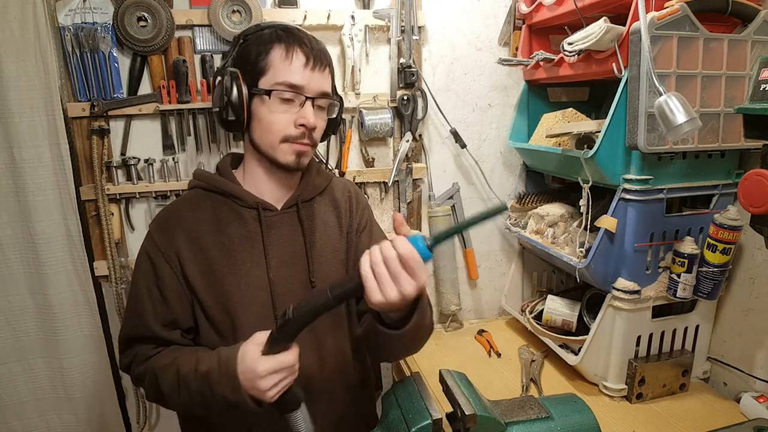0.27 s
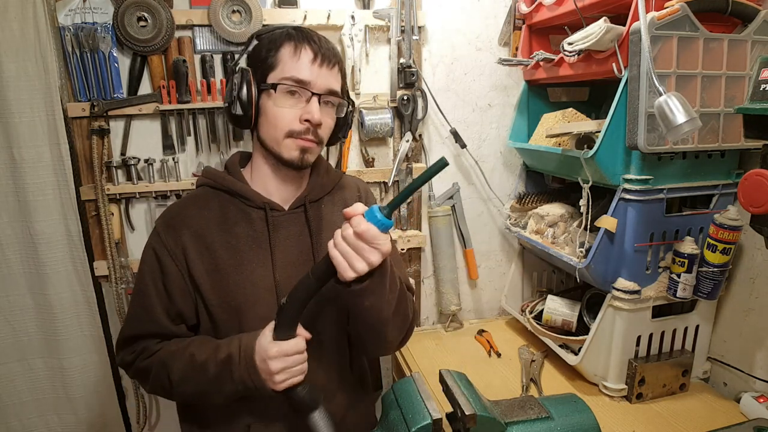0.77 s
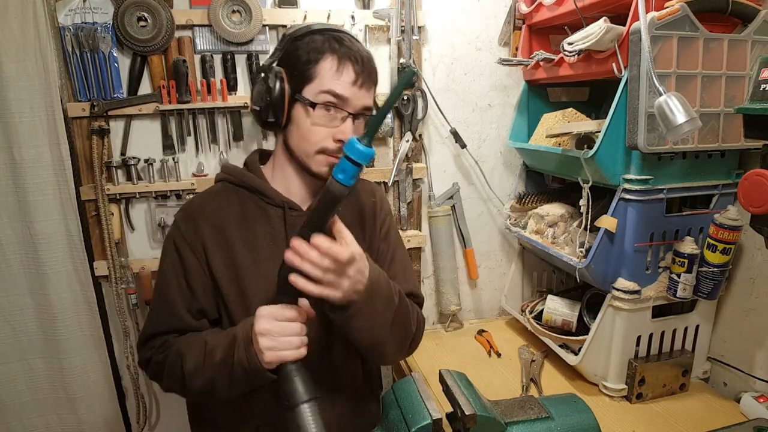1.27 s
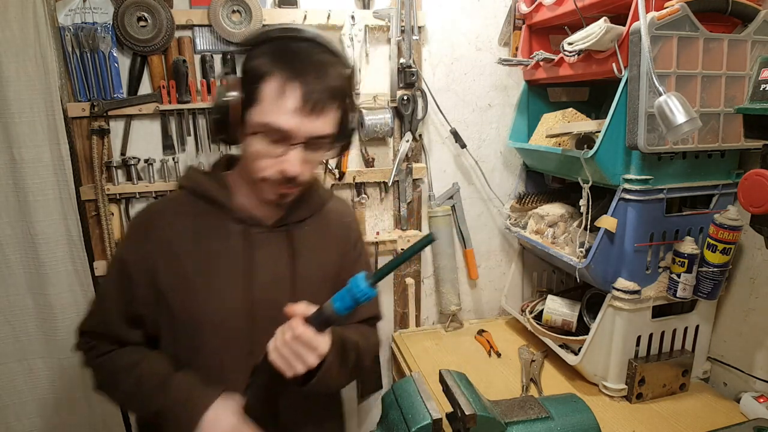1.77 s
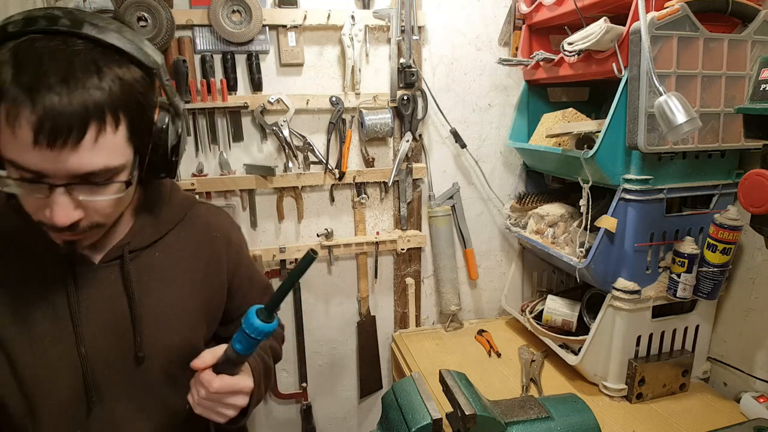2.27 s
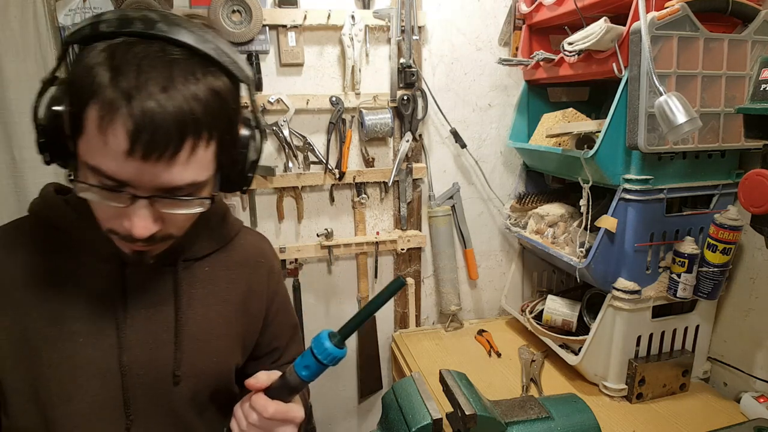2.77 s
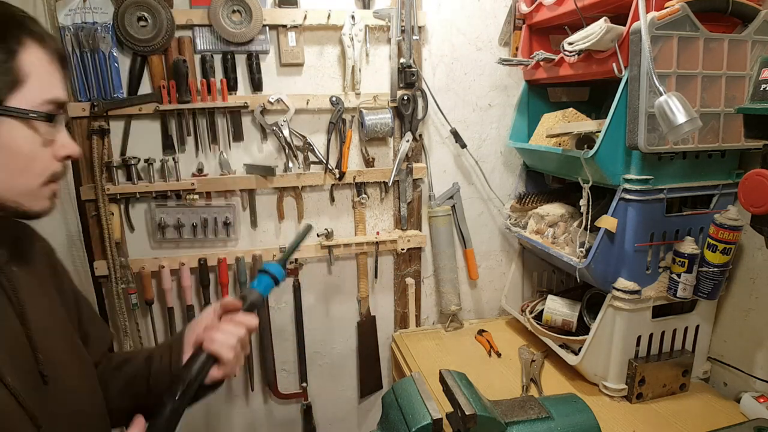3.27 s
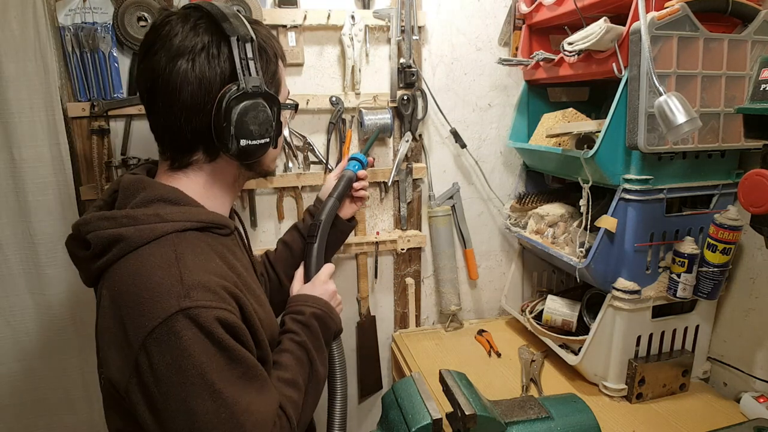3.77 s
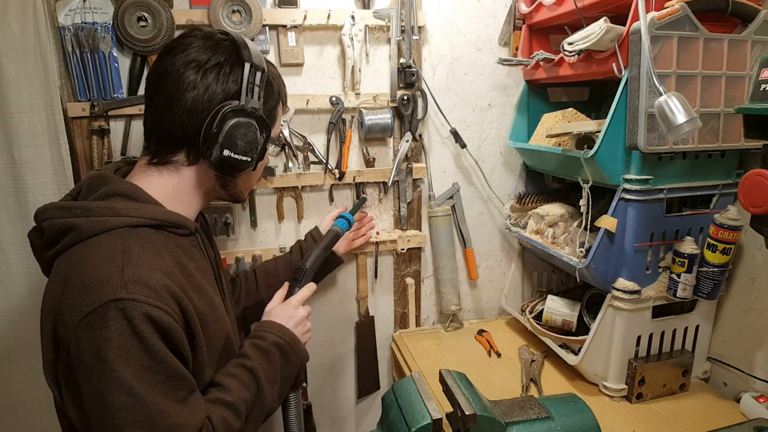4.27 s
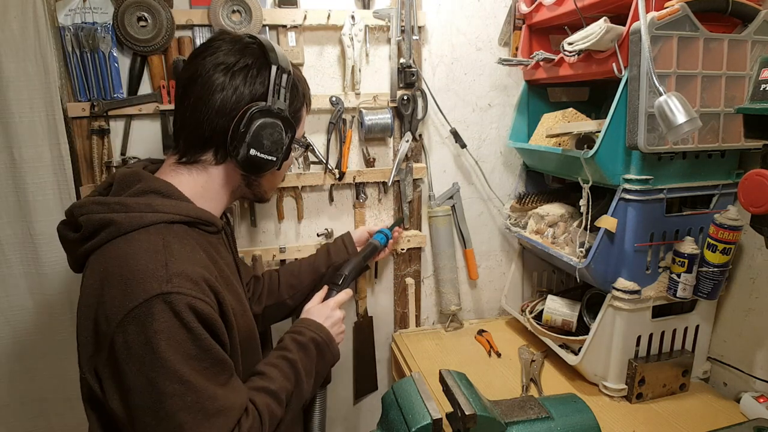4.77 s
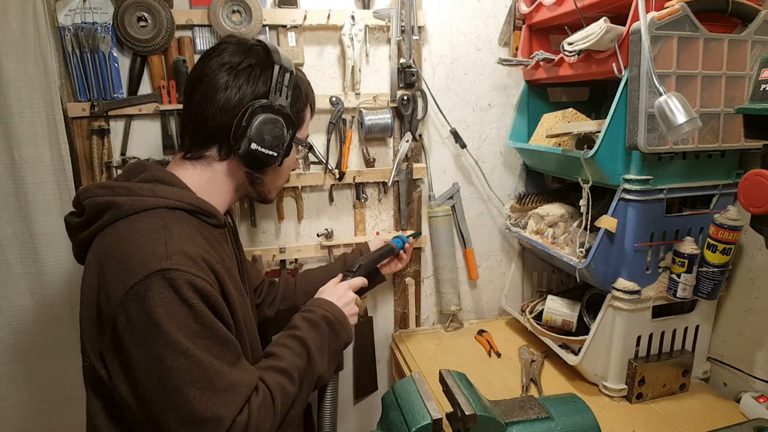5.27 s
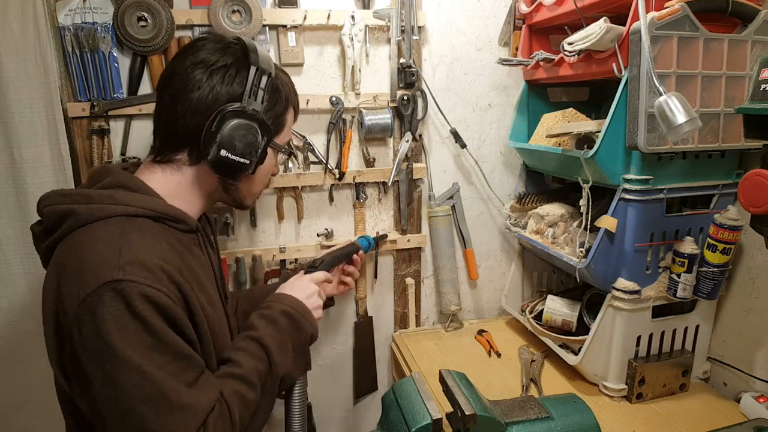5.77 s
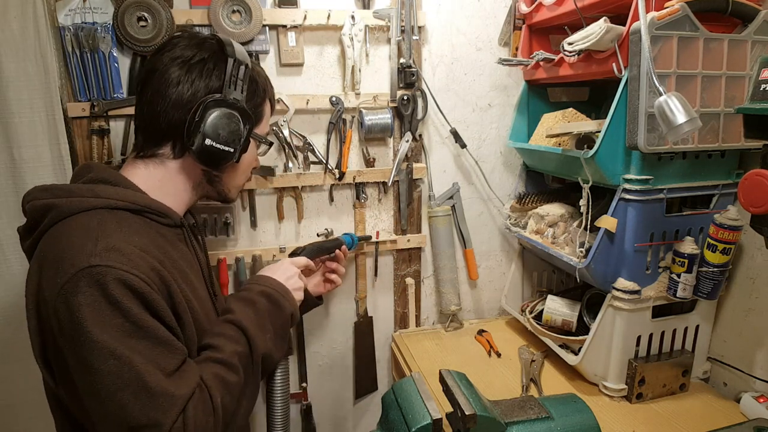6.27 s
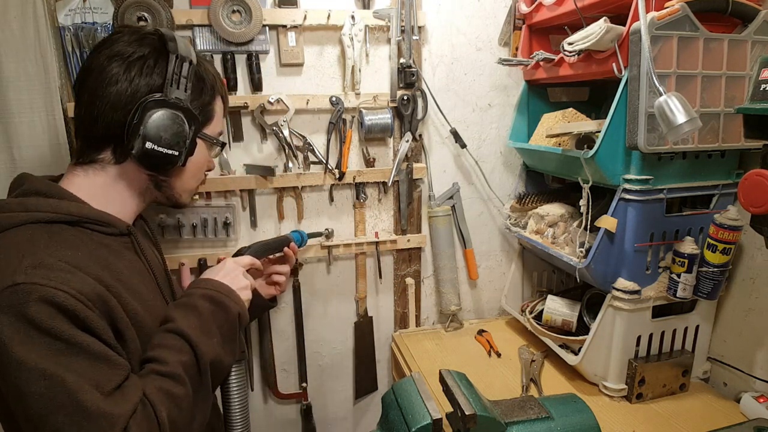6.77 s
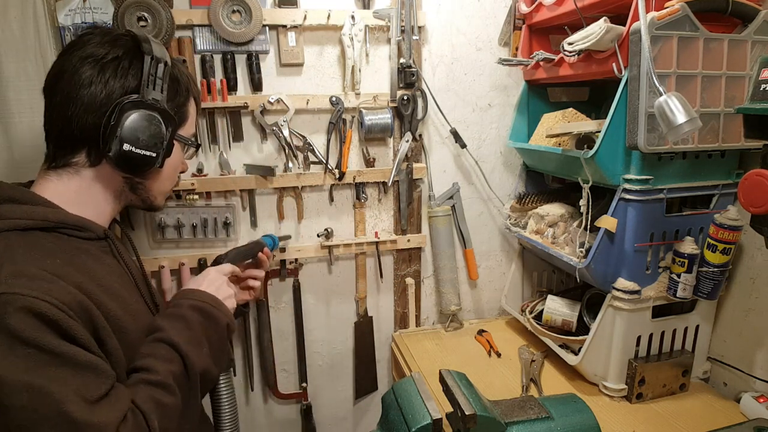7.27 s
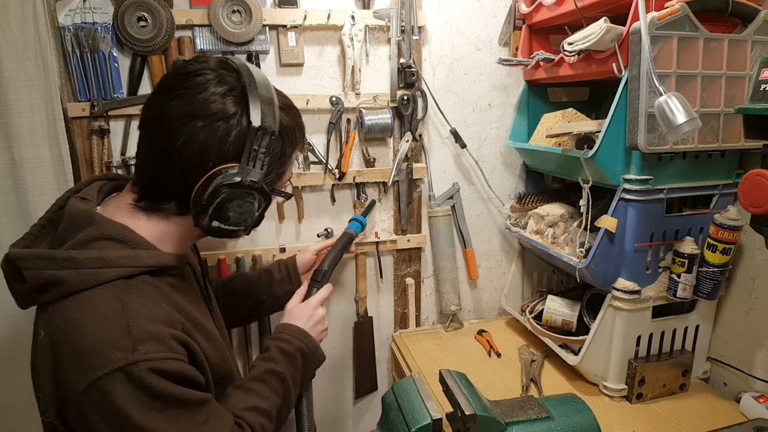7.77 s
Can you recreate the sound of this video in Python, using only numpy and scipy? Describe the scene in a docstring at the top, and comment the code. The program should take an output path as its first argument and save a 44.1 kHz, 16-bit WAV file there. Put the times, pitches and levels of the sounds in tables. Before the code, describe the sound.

Soft hose handling and footsteps in a workshop, then a shop vacuum switches on and runs with a whine and rushing, spitting air.

```python
"""A small workshop with a shop vacuum, heard through one microphone. The plastic hose is handled and
knocked, two steps thud on the floor, then the switch snaps and the motor spins up at once.
Its shaft sings, its fan blades whine and the mains current hums over rushing air.
The air roars in the hose at first, and spits as fingers and objects come near the narrow nozzle."""
import sys
import numpy as np
from scipy import signal
from scipy.fft import rfft, irfft, next_fast_len
from scipy.io import wavfile
from scipy.ndimage import uniform_filter1d, map_coordinates

SR = 44100
rng = np.random.default_rng(int(sys.argv[2]) if len(sys.argv) > 2 else 0)


def materialize(psi):
    """Save the field psi as 16-bit PCM at rate SR to the path in sys.argv[1].

    A 1-D psi becomes a single channel; in a 2-D psi each row is a channel.
    """
    bounded = np.clip(np.atleast_2d(psi).T, -1, 1)
    quanta = np.round(bounded * 32767).astype(np.int16)
    wavfile.write(sys.argv[1], SR, quanta)


N = 354211
TIME = np.arange(N) / SR
ONE_SECOND = np.arange(SR) / SR
SWITCH_S, FREE_UNTIL_S = 3.062, 3.765  # the switch closes; the nozzle leaves free air


def amp(db):
    """Turn decibels (dB) into a number to multiply by."""
    return 10 ** (np.asarray(db) / 20)

def unit(x):
    """Scale a signal to an average power of 1."""
    return x / np.sqrt(np.mean(x ** 2) + 1e-20)

def along(points, hz):
    """Read between (Hz, value) points, with octaves evenly spaced."""
    freqs, values = np.transpose(points)
    return np.interp(np.log(hz + 1), np.log(freqs + 1), values)

def curve(points):
    """Join (seconds, value) points with straight lines."""
    return np.interp(TIME, *np.transpose(points))

def wobble(rate):
    """A smooth random curve through `rate` points a second."""
    return map_coordinates(rng.standard_normal(int(N * rate / SR) + 4), [TIME * rate])

def bump(s, length):
    """A bell-shaped rise and fall around time s."""
    return np.exp(-np.minimum(((TIME - s) / length) ** 2, 60))

def after(s, change_s=0.013):
    """A smooth step from 0 to 1 at time s."""
    return (1 + np.tanh((TIME - s) / change_s / 2)) / 2

def struck(db, rise, fade):
    """The loudness of a knock: it rises fast, then drops 60 dB in `fade` seconds."""
    return amp(db - 60 * ONE_SECOND / fade) * (1 - np.exp(-ONE_SECOND / rise))

def filtered(x, response):
    """Turn each frequency of x up or down by response(hz)."""
    size = next_fast_len(len(x) + 8192)
    return irfft(rfft(x, size) * response(np.fft.rfftfreq(size, 1 / SR)), size)[:len(x)]

def boost(peaks, hz):
    """The dB added by resonances, the pitches at which a thing likes to ring."""
    return sum(db / (1 + (2 * (hz - centre) / width) ** 2) for centre, width, db in peaks)

def noise(colour, peaks=()):
    """Noise with a colour (its balance of low and high) and resonances on top."""
    return unit(filtered(rng.standard_normal(N), lambda hz: amp(along(colour, hz) + boost(peaks, hz))))

def band(centre_hz, width_hz):
    """One second of noise around one pitch."""
    gain = lambda hz: 1 / (1 + ((hz ** 2 - centre_hz ** 2) / (width_hz * (hz + 1))) ** 2 / 2)
    return unit(filtered(rng.standard_normal(SR), gain))

def add(track, s, sound):
    """Mix a sound into the track from time s on."""
    start = round(s * SR)
    piece = sound[max(-start, 0):max(N - start, 0)]
    track[max(start, 0):][:len(piece)] += piece

def strokes(rows, tone, broad):
    """Short swells, each with its own tone over the same broad noise."""
    out = np.zeros(N)
    for s, db, hz, width, length in rows:
        bell = np.exp(-((ONE_SECOND - .5) / length) ** 2)
        add(out, s - .5, amp(db) * tone(hz, width) * bell)
        out += amp(db) * bump(s, length) * broad
    return out

def blend(share, a, b):
    """Mix two noises at even power; share 1 is all a, share 0 all b."""
    return np.sqrt(share) * a + np.sqrt(1 - share) * b


# Each row: frequency in Hz, relative level in dB. All COLOUR tables read this way.
QUIET_COLOUR = [(20, -30), (50, -7.5), (90, -9.5), (190, -12.5), (440, -17), (1100, -21), (2600, -25),
                (8000, -34), (12500, -36.5), (14000, -52)]

def quiet_room():
    """A faint, low background noise."""
    return amp(-72) * noise(QUIET_COLOUR)

# Each row: frequency in Hz, seconds the echo takes to fade.
WALL_FADES = [(100, 0.14), (500, 0.31), (4000, 0.14), (14000, 0.069)]

def room_echo(x, echo_db):
    """Crowded walls add a short echo to the direct sound."""
    hz, t, spectrum = signal.stft(rng.standard_normal(SR // 2), SR, nperseg=256)
    fading = amp(-60 * t / along(WALL_FADES, hz)[:, None])
    tail = signal.istft(spectrum * fading, SR, nperseg=256)[1]
    echo = signal.fftconvolve(x, tail / np.linalg.norm(tail))[:N]
    return (x + amp(echo_db) * echo) / np.hypot(1, amp(echo_db))

# Each row: start in seconds, level in dB.
FLOOR_THUDS = [(.0, -62), (.241, -58), (0.349, -59), (1.2, -42), (1.823, -54), (2.1, -35), (2.438, -35.5),
               (2.588, -42)]

def footsteps(floor_hz=85.1):
    """Steps and shifts of weight make the floor ring briefly."""
    out = np.zeros(N)
    tone = np.sqrt(2) * np.sin(2 * np.pi * floor_hz * ONE_SECOND)
    for s, db in FLOOR_THUDS:
        rumble = 0.55 * band(0.72 * floor_hz, 0.5 * floor_hz)
        add(out, s, struck(db, rise=0.051, fade=0.42) * (tone + rumble))
    return out

# Scuffing cloth. Each row: frequency in Hz, relative level in dB.
SCUFF_COLOUR = [(200, -8), (500, 3), (2000, -2), (5000, -7), (9000, -6.5), (13000, -14)]
# Each row: middle in seconds, level in dB, rib pitch in Hz, width in Hz, length in seconds.
HOSE_RUBS = [(.03, -65.5, 2680, 900, 0.038), (.12, -70, 4400, 2000, .07), (.36, -75, 4000, 2500, .054),
             (.895, -71, 3650, 350, 0.043), (1.15, -64, 6000, 6000, 0.033),
             (1.535, -62.5, 4700, 800, 0.022), (1.595, -69.5, 4840, 1500, .05),
             (1.75, -68.5, 2430, 900, 0.046), (1.87, -61.5, 2660, 350, 0.036), (2.05, -63, 4340, 400, 0.03),
             (2.445, -61, 5600, 2500, 0.017), (2.6, -64, 1170, 1200, 0.11)]

def hose_rubs():
    """Hands and sleeves slide over the ribs: a rough note, its octave and a scuff."""
    ribs = lambda hz, width: band(hz, width) + amp(-9.5) * band(2 * hz, width)
    scuff = amp(-4.5) * noise(SCUFF_COLOUR)
    return strokes(HOSE_RUBS, ribs, scuff) * amp(-4 + 2.1 * wobble(250))

# Each row: start in seconds, level in dB, pitch in Hz, width in Hz, fade in seconds.
PLASTIC_CLICKS = [(.117, -34.5, 4100, 2400, 0.0073), (.754, -45.5, 3250, 1100, .016),
                  (.88, -60, 3900, 1000, .04), (2.424, -55.5, 513, 120, 0.11),
                  (2.574, -48, 1350, 800, 0.06)]
# Each row: pitch in Hz, width in Hz, boost in dB.
TUBE_RESONANCES = [(3120, 120, 1.5), (3730, 340, 9.5), (4300, 200, 4), (4700, 180, 12), (5350, 190, 16),
                   (7400, 250, 2)]

def tube_clicks():
    """Light taps click and leave the plastic tube ringing."""
    out = np.zeros(N)
    for s, db, hz, width, fade in PLASTIC_CLICKS:
        add(out, s, struck(db, rise=0.0018, fade=fade) * band(hz, width))
        add(out, s, struck(db - 23.5, rise=0.0018, fade=0.12) * noise(SCUFF_COLOUR)[:SR])  # the ring
    return filtered(out, lambda hz: amp(-1.5 + boost(TUBE_RESONANCES, hz)))

# Each row: start in seconds, level in dB.
HOSE_SLAPS = [(1.1754, -45.5), (1.191, -46), (1.207, -53.5)]
# Each row: pitch in Hz, width in Hz, dB added to the slap's level, rise and fade in seconds.
SLAP_RINGS = [(167, 42, 2, 0.027, 0.24), (230, 33, -3, 0.018, 0.21), (375, 190, -0.5, 0.0033, 0.12),
              (1350, 780, -6, .0008, 0.15), (6000, 7300, -7.5, 0.00055, 0.2), (3500, 4400, 2, .0001, 0.013)]

def hose_slaps():
    """The hose slaps into the hand and bounces, ringing at several pitches."""
    out = np.zeros(N)
    for s, db in HOSE_SLAPS:
        for hz, width, extra_db, rise, fade in SLAP_RINGS:
            add(out, s, struck(db + extra_db, rise, fade) * band(hz, width))
    return out

def switch_snap():
    """The housing jolts as the switch closes."""
    out = np.zeros(N)
    add(out, SWITCH_S, struck(-45, rise=.007, fade=.33) * band(600, 700))
    return out

def handling():
    """All the plastic sounds in the room, with the treble above about 10 kHz dulled."""
    plastic = tube_clicks() + hose_rubs() + switch_snap() + hose_slaps()
    dulled = filtered(plastic, lambda hz: 1 / np.hypot(1, (hz / 10300) ** 7))
    return room_echo(dulled, echo_db=-4.5)

def mains_hum(since_on):
    """The motor hums at twice the 50 Hz mains, loudest in the surge of current as it starts."""
    surge = amp(-35.5) * np.exp(-((since_on - .048) / 0.018) ** 2)
    tone = np.sqrt(2) * np.sin(2 * np.pi * 100 * since_on)
    return (amp(-58 + wobble(3.2)) + surge) * tone

# Running speed as the load changes. Each row: time in seconds, turns per second.
SHAFT_SPEED = [(3.75, 738), (3.83, 717), (3.9, 705), (4.08, 699), (4.2, 709), (4.3, 718), (4.55, 720),
               (4.63, 710), (4.8, 706), (4.95, 705), (5.08, 711), (5.3, 702.5), (5.7, 704), (5.87, 712),
               (6.9, 716), (7.45, 712), (7.63, 706), (8.03, 704)]
# The shaft's tone sinks during hollow suction. Each row: time in seconds, level in dB.
SHAFT_LEVEL = [(3.1, -50), (3.23, -41), (3.3, -47), (3.4, -38), (3.55, -47), (3.72, -51), (3.85, -42),
               (4.1, -42), (4.22, -46.5), (4.32, -45.5), (4.8, -56), (5.75, -56), (5.95, -45.5), (6.5, -45),
               (7.1, -43), (7.55, -52), (8.03, -80)]
# Each row: multiple of the shaft's pitch, steady level in dB.
OVERTONES = [(2, -56), (4, -56.5), (8, -56.5), (16, -61.5)]
# Each row: middle in seconds, which multiple swells, level in dB, length in seconds.
OVERTONE_SWELLS = [(3.237, 8, -53, 0.021), (3.29, 2, -48, 0.025), (3.3, 8, -49, 0.026),
                   (3.413, 8, -46.5, 0.092), (3.506, 2, -46, 0.17), (3.895, 8, -39, 0.023),
                   (4.16, 8, -38, 0.023), (4.28, 2, -47, .05), (4.64, 8, -46, .04),
                   (4.772, 8, -46.5, 0.035), (4.888, 8, -46, .04), (5.09, 8, -48, .025),
                   (5.187, 8, -44.5, 0.037), (5.565, 8, -50, 0.063), (5.86, 8, -45.5, 0.066),
                   (6.057, 8, -51, .07), (6.17, 2, -52, .05), (6.42, 8, -52.5, 0.11),
                   (6.857, 2, -50.5, 0.097), (6.922, 8, -55, .04), (7.62, 8, -46, 0.035),
                   (7.8, 8, -54, 0.054), (8.023, 8, -50, .03)]

def motor_whine(spin):
    """The shaft sings once per turn, its eight fan blades eight times; swirling air shakes the tones."""
    shaft_hz = spin * curve(SHAFT_SPEED) * (1 + .0007 * wobble(30))
    turns = np.cumsum(shaft_hz) / SR + .0058 * wobble(180)
    tone = lambda multiple: np.sqrt(2) * np.sin(2 * np.pi * multiple * turns) * amp(2.1 * wobble(32))
    out = amp(curve(SHAFT_LEVEL)) * tone(1)
    for multiple, db in OVERTONES:
        swell = sum(amp(peak_db) * bump(s, length)
                    for s, which, peak_db, length in OVERTONE_SWELLS if which == multiple)
        steady = amp(db + 2.5 * wobble(8.2)) * spin ** 16  # heard only near full speed
        out += (steady + swell) * tone(multiple)
    return out

def surging(db):
    """The gain for a layer of air, swaying randomly around db."""
    return amp(db + 0.94 * wobble(10))

# Each row: frequency in Hz, relative level in dB.
ROAR_COLOUR = [(50, -38), (85, -14), (125, -12), (175, -3.5), (230, -0.5), (290, 3), (390, 2), (470, -10.5),
               (600, -5), (900, -68)]
# Each row: pitch in Hz, width in Hz, boost in dB.
HOSE_RESONANCES = [(175, 30, 2.5), (226, 34, 12.5), (290.5, 10, 7), (344, 31, 1.5)]
# Each row: middle in seconds, boost in dB, length in seconds.
HOSE_GULPS = [(3.59, 3, 0.02), (3.69, 0.5, .05), (4.14, 12, 0.016), (4.246, 7.5, 0.06), (4.365, 8.5, 0.041),
              (4.518, 13, 0.029), (4.67, 4.5, .06), (4.9, 6.5, .04), (5.053, 5.5, 0.04), (5.207, 4, 0.074),
              (6.143, 5.5, 0.043), (6.79, 4, 0.053), (7.734, 3.5, 0.036), (7.872, 5, 0.017)]

def hose_roar(spin, free, spell):
    """Swirling air roars in the hose, drones while the nozzle is free and swells with each gulp."""
    gulps_db = sum(db * bump(s, length) for s, db, length in HOSE_GULPS)
    level = surging(-43.5 + 12 * free - 1.5 * spell) * amp(gulps_db + 1.1 * wobble(25))
    return level * spin ** 2.5 * blend(free, noise(ROAR_COLOUR, HOSE_RESONANCES), noise(ROAR_COLOUR))

# Each row: frequency in Hz, relative level in dB.
EXHAUST_COLOUR = [(300, -13), (480, 3), (580, -1), (720, 5), (1000, -1), (1300, -1), (1650, -0.5),
                  (2000, 0.5), (2400, -12), (3500, -46)]
# Each row: pitch in Hz, width in Hz, boost in dB.
DRUM_RESONANCES = [(394, 76, 8.5), (818, 15, 11), (896.4, 32, 9.5), (1149, 140, 10.5), (1635, 95, 5.5),
                   (1796, 41, 6.5), (2126, 18, 10)]

def exhaust(spin, free, spell):
    """Air on its way out rings the vacuum's drum, most during hollow suction."""
    ringing = (1 - free) * np.clip(0.78 + 0.32 * spell, 0, 1)
    level = surging(-39.3 + free + 4.5 * spell) * spin ** 2.7
    return level * blend(ringing, noise(EXHAUST_COLOUR, DRUM_RESONANCES), noise(EXHAUST_COLOUR))

# The rush, the hiss and the hiss in free air. Each row: frequency in Hz, relative level in dB.
RUSH_COLOUR = [(1300, -68), (2200, 0.5), (2800, 5), (3200, 1.5), (3600, 4.5), (4000, 0), (4600, 3),
               (5600, 0), (6300, -12), (8000, -50)]
HISS_COLOUR = [(4500, -9), (6100, 3.5), (8000, 2), (9500, 1.5), (11000, -5), (13000, -10.5), (15700, -17)]
FREE_HISS_COLOUR = [(4500, -49), (6000, 3.5), (7500, 1.5), (7950, 6), (8500, -1), (10000, -7), (12000, -14),
                    (15700, -23)]

def nozzle_hiss(spin, free, spell):
    """Air pulled through the narrow nozzle makes a bright rush and a higher hiss."""
    rush = surging(-42.5 + 2.8 * free + 1.1 * spell) * spin ** 2 * noise(RUSH_COLOUR)
    hiss = surging(-46 + 4 * free - 0.15 * spell) * spin ** 3.9
    hiss *= blend(free, noise(FREE_HISS_COLOUR), noise(HISS_COLOUR))
    return rush + hiss

# Each row: middle in seconds, level in dB, pitch in Hz, width in Hz, length in seconds.
NOZZLE_SPITS = [(4.353, -37.5, 10700, 1800, 0.016), (4.405, -38, 10800, 5000, 0.033),
                (4.443, -33, 3400, 2600, 0.029), (4.53, -40.5, 4000, 4000, 0.027),
                (4.685, -51, 13250, 3000, .03), (5.01, -45, 9750, 4500, 0.061),
                (5.115, -44, 10530, 4000, .022), (6.16, -44, 9900, 4000, 0.042),
                (6.63, -50, 8000, 5000, .05), (6.74, -41, 10000, 3000, 0.035),
                (6.812, -37, 8760, 7500, 0.029), (7.26, -43.5, 8500, 3500, .037),
                (7.44, -36, 4813, 3500, 0.022), (7.51, -37, 3250, 2600, 0.042),
                (7.76, -53, 12000, 3500, .035), (7.94, -49, 9000, 3500, 0.029)]

def nozzle_spits():
    """The air spits as fingers and objects come near the nozzle."""
    hiss = amp(-11.5) * noise(HISS_COLOUR)
    return strokes(NOZZLE_SPITS, band, hiss) * amp(-.5 + 2.2 * wobble(160))

def shifting_echoes(x, depth_db):
    """Random drifting peaks and dips imitate a moving source's echoes adding and cancelling."""
    spectrum = signal.stft(x, nperseg=1024)[2]
    drift = uniform_filter1d(rng.standard_normal(spectrum.shape), size=2, axis=0)  # smooth over pitch
    drift = uniform_filter1d(drift, size=24, axis=1)  # and over time
    gain = unit(amp(depth_db * unit(drift)))
    return signal.istft(spectrum * gain, nperseg=1024)[1][:N]

# Spells of hollow suction. Each row: start and end in seconds, depth from 0 to 1.
SUCTION_SPELLS = [(3.8, 4.11, .5), (4.36, 5.72, 0.94), (7.38, 8.203, 0.86)]

def airflow(spin):
    """Suction reaches the hose and drum first, the nozzle last; small openings give little deep bass."""
    free = 1 - after(FREE_UNTIL_S)  # 1 while the nozzle is in free air
    spell = sum(depth * (after(start) - after(end)) for start, end, depth in SUCTION_SPELLS)
    body = hose_roar(spin, free, spell) + exhaust(spin, free, spell)
    nozzle = shifting_echoes(nozzle_hiss(spin, free, spell) + nozzle_spits(), depth_db=2)
    flow = after(SWITCH_S + .024) * body + after(SWITCH_S + .046) * nozzle
    return filtered(flow, lambda hz: 1 / np.hypot(1, (58 / (hz + 1)) ** 3))

def scene():
    """Handling and steps in the quiet room, then the running vacuum."""
    since_on = np.maximum(TIME - SWITCH_S, 0)
    power = 1 - np.exp(-since_on / 0.017)
    spin = 1 - .32 * np.exp(-since_on / .106)  # share of running speed: starts high, then creeps to 1
    dip = 1 - 0.81 * np.exp(-((TIME - 3.05) / 0.017) ** 2)  # the level dips just before the switch
    workshop = handling() + footsteps() + quiet_room()
    vacuum = motor_whine(spin) + mains_hum(since_on) + airflow(spin)
    mono = dip * workshop + power * vacuum
    return np.array([mono, mono])

def record(dry):
    """The microphone dulls the highest treble, and nothing above 15720 Hz is kept."""
    response = lambda hz: (hz < 15720) / np.hypot(1, (hz / 15000) ** 6)
    return np.array([filtered(x, response) for x in dry])


dry = scene()
out = record(dry)
materialize(out)
```